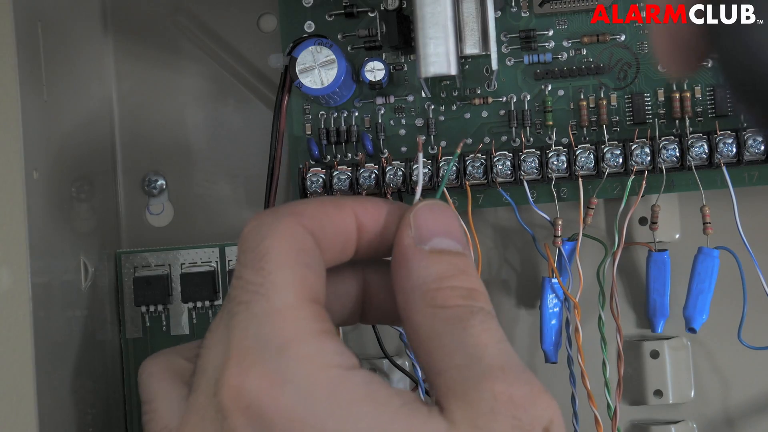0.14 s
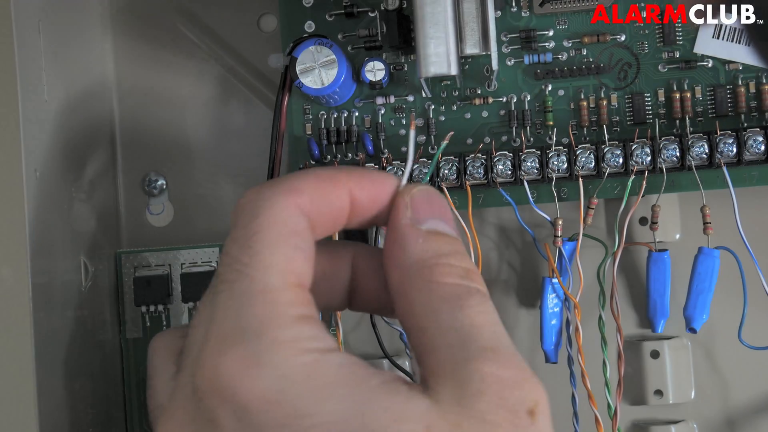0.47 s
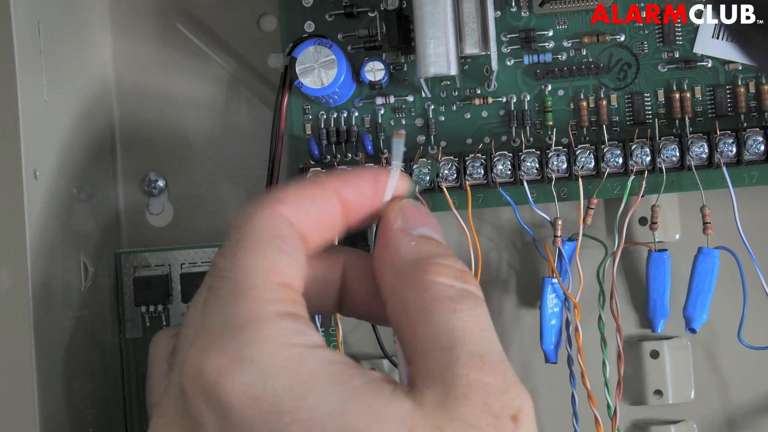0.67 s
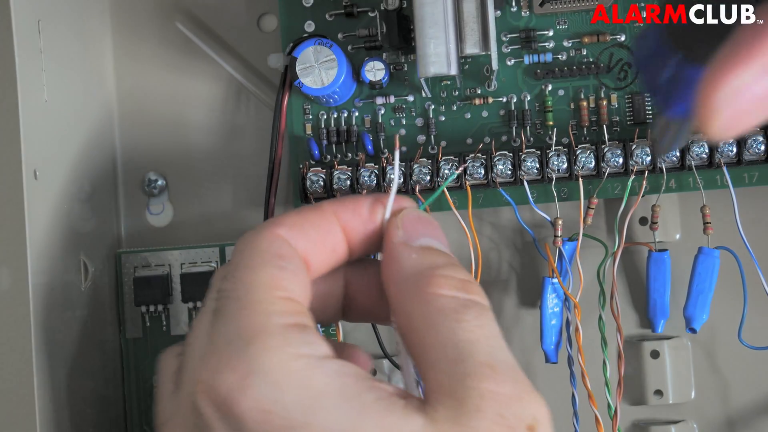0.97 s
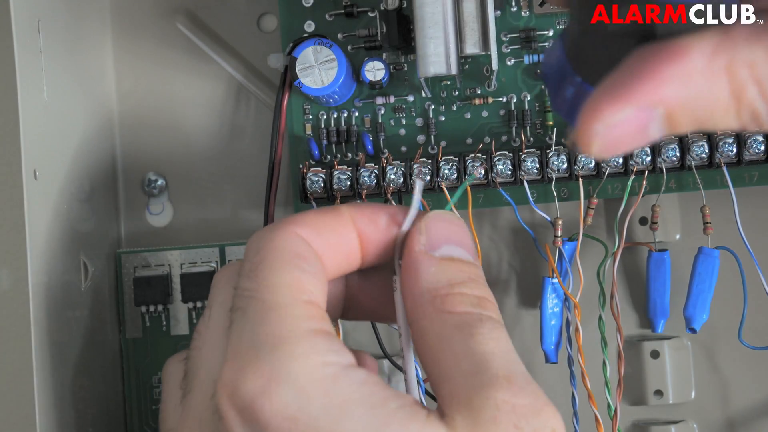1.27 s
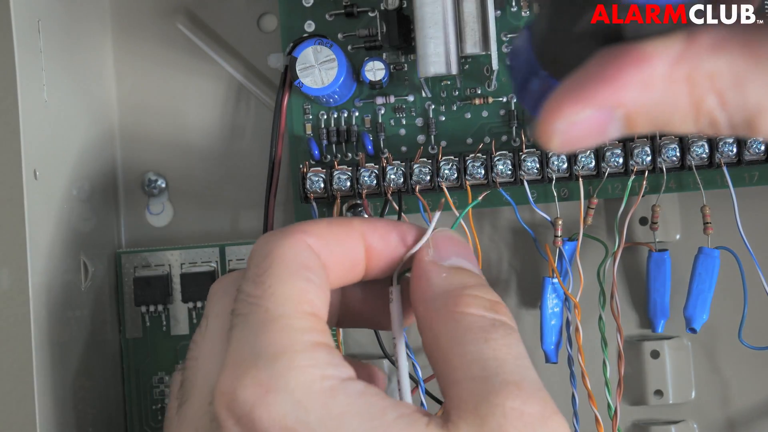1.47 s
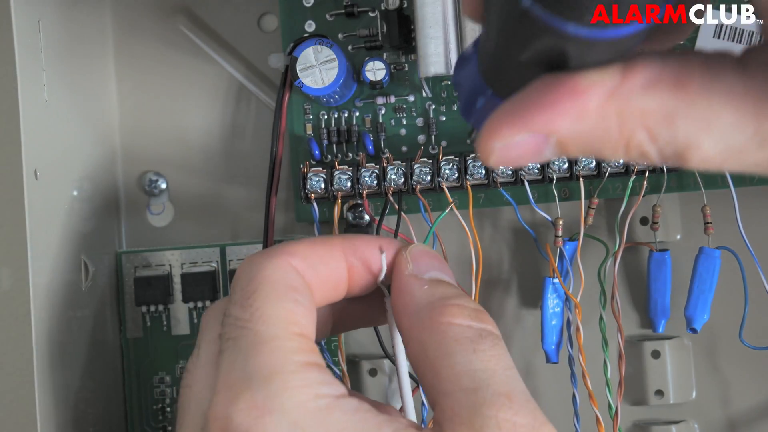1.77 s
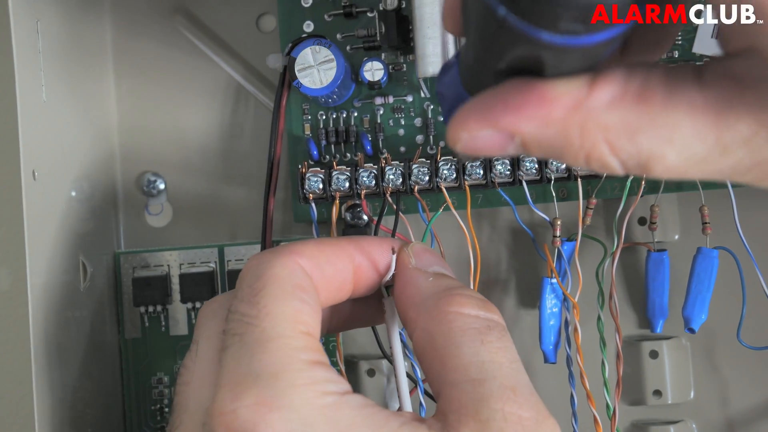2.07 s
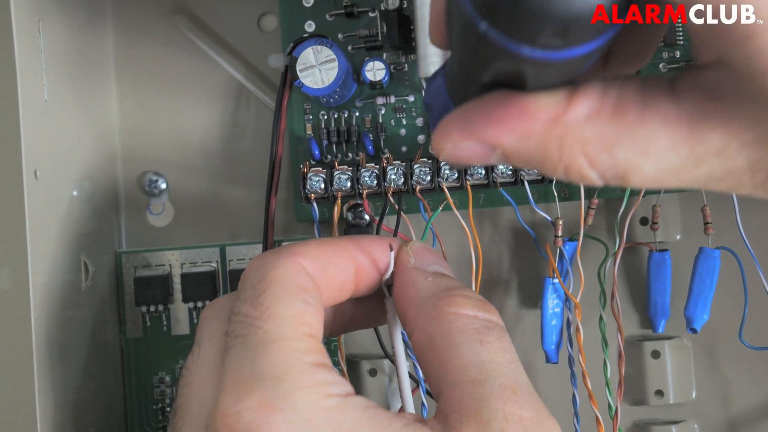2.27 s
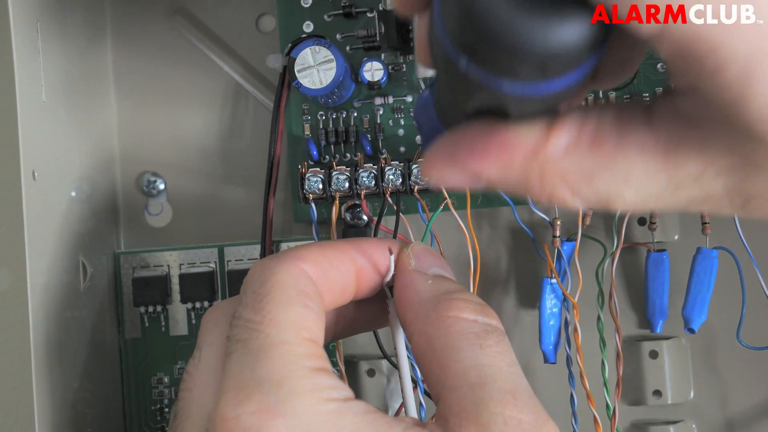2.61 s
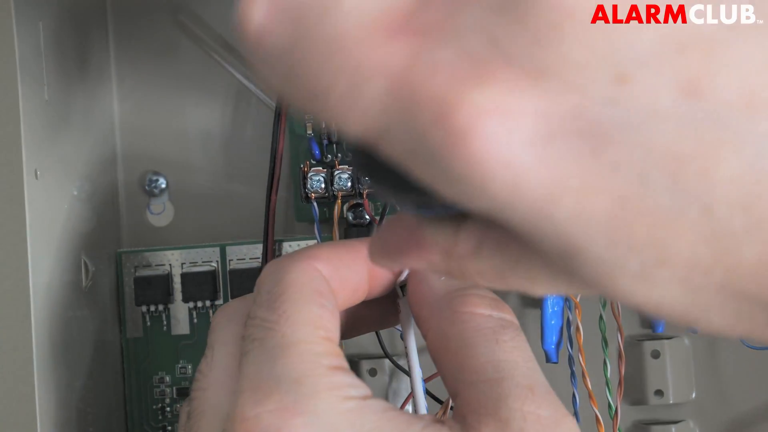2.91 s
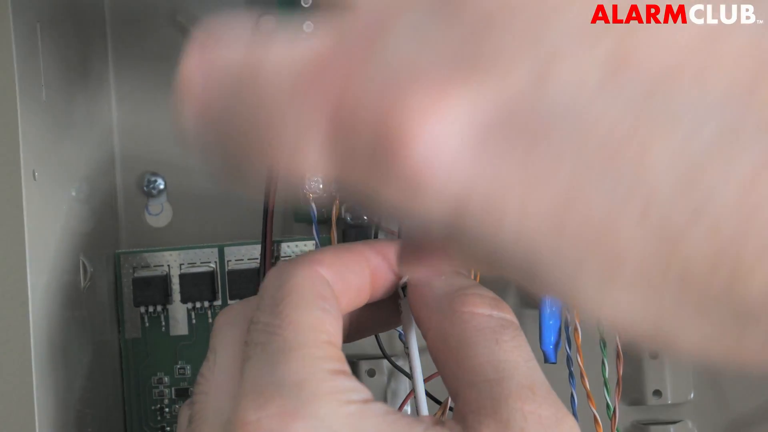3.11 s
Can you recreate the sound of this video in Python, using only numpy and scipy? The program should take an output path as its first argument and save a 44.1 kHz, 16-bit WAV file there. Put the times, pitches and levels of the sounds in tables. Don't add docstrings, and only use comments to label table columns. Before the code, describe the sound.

Wire handling clicks at a screw terminal block in an open sheet-metal cabinet, over faint room hiss and hum. Sparse light ticks come at 0.4-0.7, 1.0 and 1.5-1.8 seconds, sharpest at 1.7, then a gritty scrape at 1.83. Tool handle knocks with low thumps and short rings follow at 2.3-2.7; a hard, bright chattering blow hits at 2.9, then a low knock at 3.0. Close stereo, left stronger.

```python
import sys
import numpy as np
from scipy import signal
from scipy.fft import rfft, irfft
from scipy.io import wavfile

SR = 44100
rng = np.random.default_rng(int(sys.argv[2]) if len(sys.argv) > 2 else 0)


def convert_level_to_amplitude(level_db):
    exponent = np.asarray(level_db, float) / 20
    return 10 ** exponent


def transcribe(u):
    v = np.clip(np.atleast_2d(u).T, -1, 1)
    q = np.round(v * 32767).astype(np.int16)
    wavfile.write(sys.argv[1], SR, q)


N = 143325

# pitch_hz, level_db (per Hz)
HISS_COLOUR = [(25, -0.5), (70, -0.5), (150, -6), (500, -13), (1000, -18), (2000, -23), (4000, -27.5),
               (16000, -34)]
# pitch_hz, width_hz, level_db, start_s, end_s
WHISTLES = [(793, 35, -72, -1, 5), (439, 40, -75, -1, 5), (1195, 120, -73.5, 0.32, 1.05)]
# pitch_hz, lag_radians
RIGHT_LAG = [(100, 2.8), (700, 4.62), (1300, 4.72), (2100, 7), (3000, 6.15), (5000, 7.6)]
# pitch_hz, left_minus_right_db
LEFT_LEAN = [(100, 6.5), (300, 7.5), (1300, 6), (2400, 7), (4400, 1), (8000, 5.5), (14000, -3)]

# pitch_hz, level_db, fade_60db_s
BOARD_MODES = [(1100, -24, 0.096), (1260, -1.5, 0.074), (1321, 0, 0.059), (1494, -5, 0.065),
               (1600, -4.5, 0.035), (1799, -8, 0.094), (2100, -5, 0.046), (2300, 0, 0.032),
               (2700, -2, 0.034), (2789, -4.5, 0.078), (3130, -6.5, 0.086), (3346, 1, 0.033),
               (3560, -8, 0.11), (3780, -6, 0.035)]
# pitch_hz, level_db, fade_60db_s
WALL_MODES = [(97, -1, 0.15), (130.2, 3.5, 0.3), (162, -6.5, 0.35), (209.4, -6, 0.31), (223, -5, 0.24),
              (375.5, -7, 0.21), (440, 1, 0.04), (464.2, -4, 0.17), (500, -3.5, 0.18), (545, -11, 0.18),
              (765, -11.5, 0.14), (859, -7, 0.12), (966, -11, 0.17)]
# pitch_hz, level_db, fade_60db_s
TOOL_MODES = [(4630, -12, 0.06), (7000, -8, 0.048), (6700, -23, 0.031), (9500, -17, 0.06),
              (10140, -24, .05), (12300, -23, 0.05)]
# pitch_hz, fade_60db_s
DENSE_FADE = [(100, 0.72), (500, 0.19), (1500, 0.12), (4000, 0.099), (12000, 0.047)]

# pitch_hz, level_db
CONTACT_COLOUR = [(300, -48.5), (800, -7), (1200, -2), (2600, 1.5), (4000, -2), (4700, -11), (8000, -45.5)]
# pitch_hz, level_db
FIZZ_COLOUR = [(3000, -18), (5000, 4), (6500, 10.5), (8000, 4), (10500, 10.5), (15000, 2.5), (17000, -6)]
# pitch_hz, level_db
THUMP_COLOUR = [(40, -17), (100, -7), (500, -3.5), (900, 0), (2000, -34)]

# start_s, pitch_hz, level_db, fade_60db_s
WIRE_PINGS = [(0.384, 3200, -55, .035), (.385, 1900, -55, 0.044), (.451, 3420, -51, 0.038),
              (.451, 2980, -60, .025), (.455, 1980, -60, 0.035), (.475, 1950, -64, .03),
              (1.001, 1584, -51, 0.046), (1.068, 3340, -53, 0.062), (1.068, 1320, -48, 0.078),
              (1.073, 1970, -47, 0.056), (1.6799, 3310, -38, .04), (1.681, 3950, -38.5, .04),
              (1.682, 2390, -52, 0.13), (1.682, 1583, -43.5, 0.049), (1.69, 2840, -47, 0.055),
              (1.745, 2116, -53, 0.033), (1.746, 2400, -55, .03), (1.786, 3980, -58, 0.036),
              (1.787, 2480, -60, .03), (1.827, 3900, -52, .08), (1.827, 2190, -52, 0.074),
              (1.84, 3820, -51, 0.072), (2.828, 2100, -56, .04)]
# start_s, pitch_hz, level_db, fade_60db_s
PANEL_CLANGS = [(2.3334, 1310, -42, 0.036), (2.3335, 1600, -49, 0.034), (2.3335, 1960, -49, 0.028),
                (2.335, 2600, -37, 0.033), (2.334, 870, -51, .04), (2.334, 458, -39, 0.17),
                (2.334, 509, -50, .19), (2.334, 137, -50, .13), (2.402, 1277, -34.5, 0.1),
                (2.401, 456, -47, 0.18), (2.403, 513, -45, .25), (2.403, 861, -51, 0.093),
                (2.476, 2940, -45, .05), (2.618, 1390, -40, 0.056), (2.619, 888, -40, .06),
                (2.62, 516, -37, 0.094), (2.625, 197, -48, 0.21), (2.708, 482, -55, 0.14),
                (2.708, 2900, -48, 0.046), (2.721, 1334, -49, 0.21), (2.894, 1260, -31, 0.023),
                (2.8997, 2670, -16.5, 0.025), (2.8995, 2286, -22, .06), (2.8995, 2100, -24, 0.059),
                (2.8995, 3250, -32, .035), (2.903, 856, -44, .05), (2.9035, 1326, -24, .03),
                (2.893, 470, -37, .06), (2.8995, 3540, -25, .025), (2.9047, 1597, -34, .04),
                (2.897, 251, -37, .15), (2.401, 1615, -50, .05), (2.402, 138, -46, 0.33),
                (2.475, 1350, -48, .05), (2.478, 850, -51, 0.058), (2.619, 762, -52, 0.09),
                (2.619, 1105, -48, .12), (2.621, 124, -50, .2), (2.645, 300, -58, .12),
                (2.709, 140, -52, .3), (2.746, 536, -51, .1), (2.829, 1700, -54, .04),
                (2.407, 2250, -47, 0.033)]
# start_s, level_db, panel_hz
WALL_PUSHES = [(1.085, -56.5, 790), (2.336, -50, 480), (2.405, -59, 134), (2.408, -53, 500),
               (2.485, -52, 211), (2.62, -52, 920), (2.628, -49, 240), (2.72, -48, 157), (2.75, -51, 545),
               (2.895, -34.5, 97), (2.904, -41.5, 246), (2.901, -40.5, 446), (3.0, -43.5, 650)]
# start_s, level_db, accent_hz, accent_db, fizz_db
WIRE_TICKS = [(0.385, -55, 3160, -9, -58), (0.397, -60.5, 1690, 16, -68), (0.45, -55, 3470, 10, -51.5),
              (0.458, -57.5, 1970, 22, -70), (0.474, -65, 2000, 7, -66), (0.4912, -61, 2800, -2, -72),
              (0.498, -66, 3300, 7, -72), (0.704, -60, 1980, 17, -76), (1.001, -50, 1560, 20, -67),
              (1.07, -50.5, 3300, -3, -53), (1.073, -50, 1980, 15, -68), (1.083, -52.5, 1310, 8, -66),
              (1.541, -65, 2740, -1, -68), (1.605, -55, 2100, 17, -72), (1.613, -60, 2480, 5, -72),
              (1.6805, -41, 3860, 11.5, -51), (1.686, -44.5, 2470, 4, -73), (1.747, -51.5, 2100, 16, -64),
              (1.785, -55, 3000, 2, -56)]
# start_s, level_db, accent_hz, fizz_db, length_s
WIRE_SLIDES = [
    (1.826, -49, 3980, -37, 0.02),
    (1.848, -56.5, 3680, -48.5, 0.019),
    (2.718, -43, 1340, -56, 0.017),
    (2.746, -42, 2900, -47.5, 0.0099),
]
# start_s, level_db, accent_hz, fizz_db, thump_db
HANDLE_KNOCKS = [
    (2.3338, -34.5, 1780, -48, -43.5),
    (2.4016, -36.5, 1380, -51, -41),
    (2.4082, -36.5, 1870, -54, -41.5),
    (2.472, -49, 2650, -70, -49.5),
    (2.4751, -45.5, 1360, -59, -52.5),
    (2.548, -63, 2380, -77, -67),
    (2.619, -36.5, 1230, -76, -36),
    (2.707, -40, 2760, -47, -46),
    (2.828, -55, 1550, -64, -70),
    (2.997, -45, 815, -48.5, -48),
]
# start_s, level_db, accent_hz, fizz_db, thump_db
HARD_BLOW = [
    (2.8913, -38, 1380, -48, -36.5),
    (2.8928, -28.5, 1350, -43, -36.5),
    (2.8966, -27, 1190, -33, -34.5),
    (2.8992, -23.5, 2300, -20.5, -36),
    (2.9005, -26, 2740, -29, -40.5),
    (2.906, -26, 1397, -39, -36.5),
    (2.915, -31, 2300, -33, -46),
    (2.926, -32, 2580, -34.5, -43),
]


def read(points, hz):
    point_hz, value = np.transpose(points)
    return np.interp(np.log(hz + 1), np.log(point_hz + 1), value)


def unit(x):
    return x / np.sqrt(np.sum(x ** 2) + 1e-20)


def slow(hz):
    t = np.arange(N) / SR
    waves = [np.sin(2 * np.pi * (f * t + rng.random())) for f in np.geomspace(hz / 10, hz, 8)]
    return sum(waves) / 2


def room():
    f, t = np.fft.rfftfreq(N, 1 / SR), np.arange(N) / SR
    hiss = irfft(rfft(rng.standard_normal((2, N))) * convert_level_to_amplitude(read(HISS_COLOUR, f)), N)
    hiss_db = -55.5 + 0.18 * slow(3.9) + np.array([[0.4], [-0.4]])
    out = convert_level_to_amplitude(hiss_db) * unit(hiss) * np.sqrt(2 * N)
    for hz, width_hz, db, start, end in WHISTLES:
        narrow = 1 + ((f - hz) / width_hz * 2) ** 2
        tone = irfft(rfft(rng.standard_normal(N)) / narrow, N)
        on = np.clip(np.minimum(t - start, end - t) / 0.051, 0, 1)
        tone_db = db + 1.1 * slow(1.89) + np.array([[3.0], [-3.0]])
        out += convert_level_to_amplitude(tone_db) * unit(tone) * np.sqrt(N) * on
    return out


def cabinet(spot, damp):
    t = np.arange(SR // 4) / SR
    hz, db, t60 = np.transpose(BOARD_MODES + WALL_MODES + TOOL_MODES)[:, :, None]
    size = convert_level_to_amplitude(db - 60 * t / t60)
    detune, phase = spot[40:40 + len(hz), None], spot[80:80 + len(hz), None]
    turn = 2 * np.pi * (hz * (1 + 0.014 * detune) * t + phase)
    left = (size * np.sin(turn)).sum(0)
    right = (size * np.sin(turn - read(RIGHT_LAG, hz))).sum(0)
    modes = np.array([left, right])
    f, u, z = signal.stft(rng.standard_normal((2, len(t))), SR, nperseg=256)
    fade = convert_level_to_amplitude(-60 * u / read(DENSE_FADE, f)[:, None])
    dense = signal.istft(z * fade, SR, nperseg=256)[1][:, :len(t)]
    rise = np.minimum(t / 0.00069, 1)
    out = (unit(modes) + convert_level_to_amplitude(-1) * unit(dense)) * rise
    out[[0, 1], [0, 9]] += convert_level_to_amplitude(-14)
    return out * np.exp(-damp * t)


def rings():
    mix, t = np.zeros((2, N)), np.arange(SR // 4) / SR
    for (s, hz, db, t60), start in zip(WIRE_PINGS + PANEL_CLANGS, rng.random(size=70)):
        turn = 2 * np.pi * (hz * t + start) - np.array([[0], [read(RIGHT_LAG, hz)]])
        swell_s = 0.00067 + 0.65 / hz
        swell = 1 - np.exp(-t / swell_s)
        mix[:, round(s * SR):][:, :len(t)] += swell * convert_level_to_amplitude(db - 60 * t / t60) * np.sin(turn)
    return mix


def pulse(shape, hz=1000, accent_db=0, octaves=1, soft_db=0):
    f = np.abs(np.fft.fftfreq(4096, 1 / SR)) + 1
    octaves_up = np.log2(f / hz)
    accent = accent_db * np.exp(-0.5 * (octaves_up / octaves) ** 2)
    db = read(shape, f) + accent + soft_db * np.maximum(octaves_up, 0)
    spectrum = np.exp(np.conj(signal.hilbert(db * np.log(10) / 20)))
    return unit(np.fft.ifft(spectrum).real[:1500])


def add(mix, s, db, click, fizz_db, luck, thump_db=-99, length=0, damp=0, top_hz=16000):
    t = np.arange(2000) / SR
    hits = luck[:2000] ** 3 * (t <= length)
    drive = convert_level_to_amplitude(db) * np.convolve(unit(hits), click)
    grit = luck[2000:4000] * np.exp(-(t / (length + 0.0025)) ** 4)
    drive += convert_level_to_amplitude(fizz_db) * np.convolve(unit(grit), pulse(FIZZ_COLOUR, top_hz, soft_db=-55))
    drive[:1500] += convert_level_to_amplitude(thump_db) * pulse(THUMP_COLOUR)
    sound = signal.fftconvolve(drive[None], cabinet(luck[4000:], damp), axes=1)
    part = mix[:, round(s * SR):][:, :sound.shape[1]]
    part += sound[:, :part.shape[1]]


def pushes(mix, luck):
    for s, db, hz in WALL_PUSHES:
        add(mix, s, db, pulse(THUMP_COLOUR, hz, 15, 0.27), -99, next(luck))


def wires(mix, luck):
    damp = 17.4
    for s, db, hz, accent_db, fizz_db in WIRE_TICKS:
        click = pulse(CONTACT_COLOUR, hz, accent_db, 0.14, 1)
        add(mix, s, db, click, fizz_db, next(luck), damp=damp)
    for s, db, hz, fizz_db, length in WIRE_SLIDES:
        click = pulse(CONTACT_COLOUR, hz, 2.4, 0.22)
        add(mix, s, db, click, fizz_db, next(luck), db - 11.5, length, damp, 13000)


def knocks(mix, luck):
    for s, db, hz, fizz_db, thump_db in HANDLE_KNOCKS:
        click = pulse(CONTACT_COLOUR, hz, 7.5, 0.57, -4.5)
        add(mix, s, db, click, fizz_db, next(luck), thump_db)
    for s, db, hz, fizz_db, thump_db in HARD_BLOW:
        click = pulse(CONTACT_COLOUR, hz, 6.5, 0.085, -5.0)
        add(mix, s, db, click, fizz_db, next(luck), thump_db)


def handling():
    mix = np.zeros((2, N))
    luck = iter(rng.standard_normal((64, 4120)))
    pushes(mix, luck)
    wires(mix, luck)
    knocks(mix, luck)
    mix = convert_level_to_amplitude(23.5) * mix + rings()
    lean = read(LEFT_LEAN, np.fft.rfftfreq(N, 1 / SR)) / 2
    return irfft(rfft(mix) * convert_level_to_amplitude(np.array([lean, -lean])), N)


def scene():
    return room() + handling()


def roll_off(x):
    return signal.sosfilt(signal.butter(12, 16470, fs=SR, output="sos"), x)


def record(dry):
    low_pass = signal.firwin(255, 15850, fs=SR)
    mix = signal.oaconvolve(dry, low_pass[None], "same")
    return roll_off(mix)


dry = scene()
out = record(dry)
transcribe(out)
```